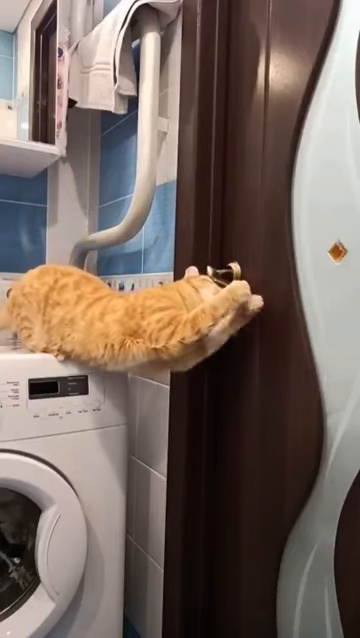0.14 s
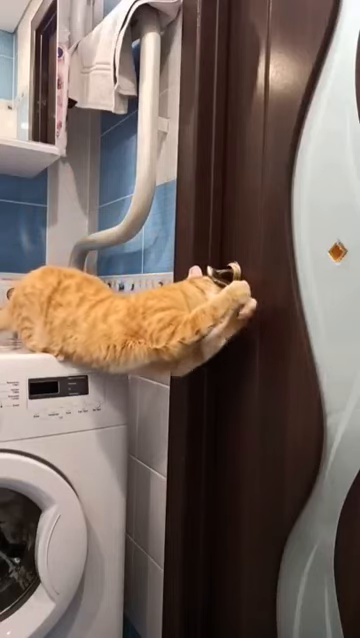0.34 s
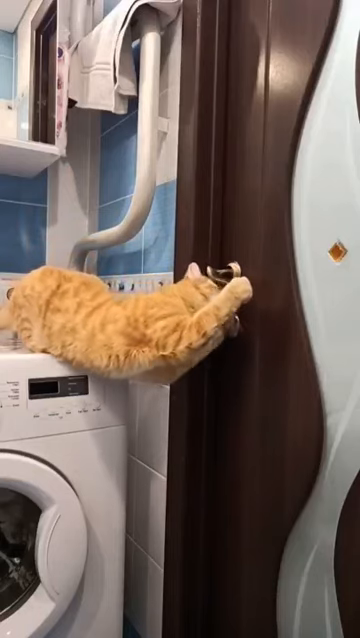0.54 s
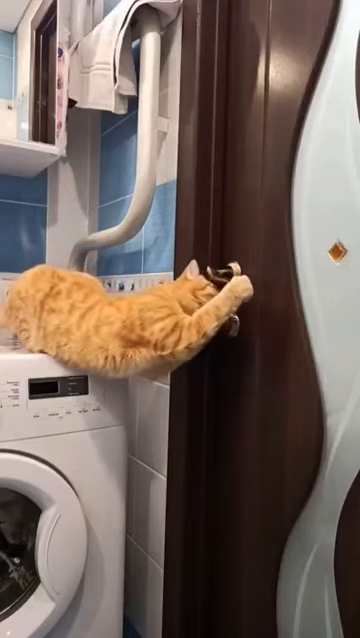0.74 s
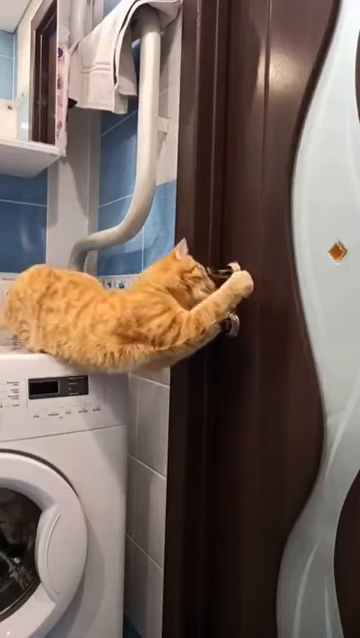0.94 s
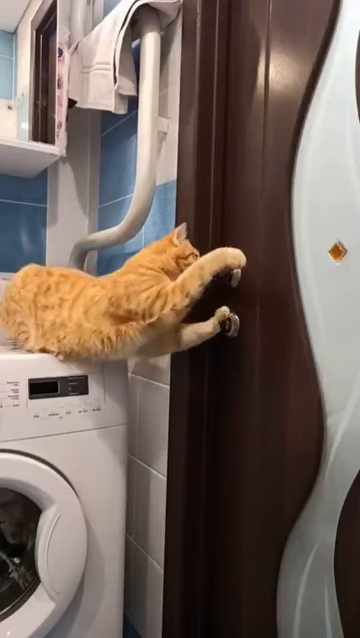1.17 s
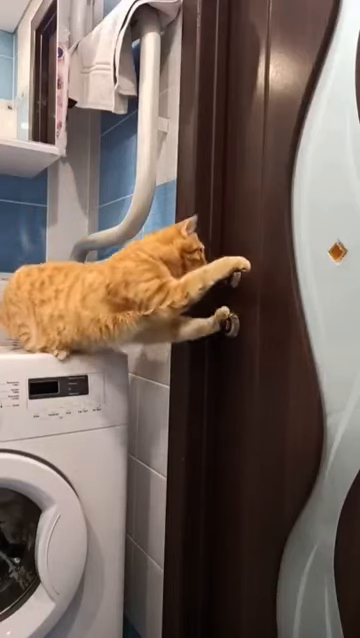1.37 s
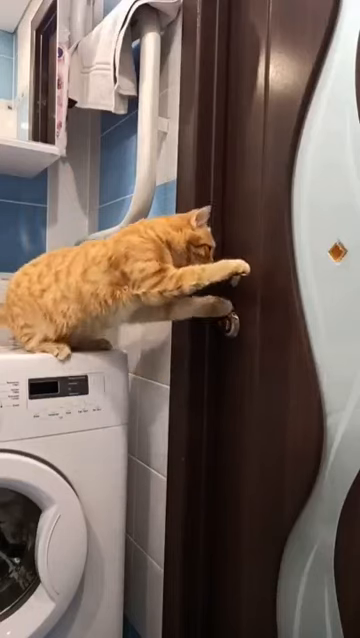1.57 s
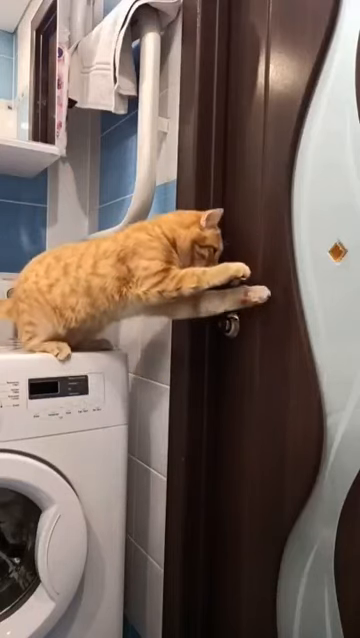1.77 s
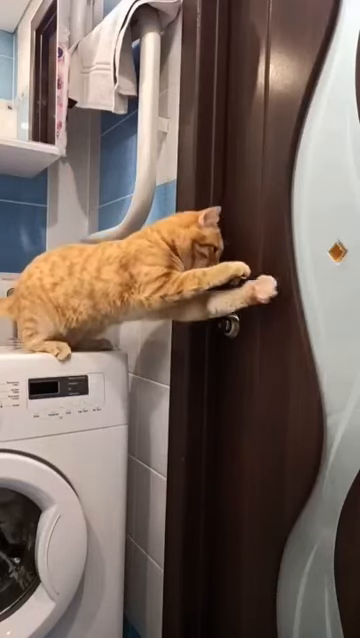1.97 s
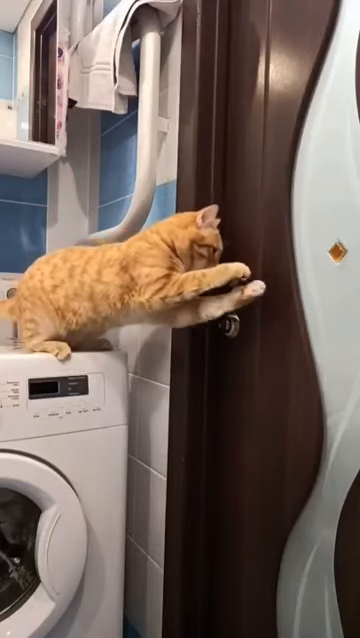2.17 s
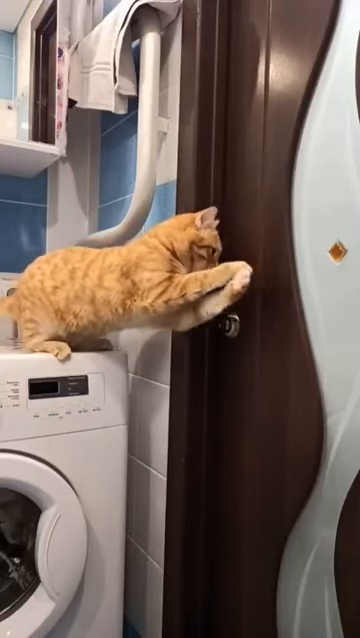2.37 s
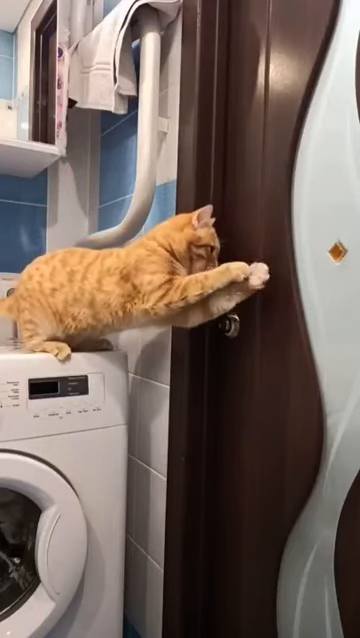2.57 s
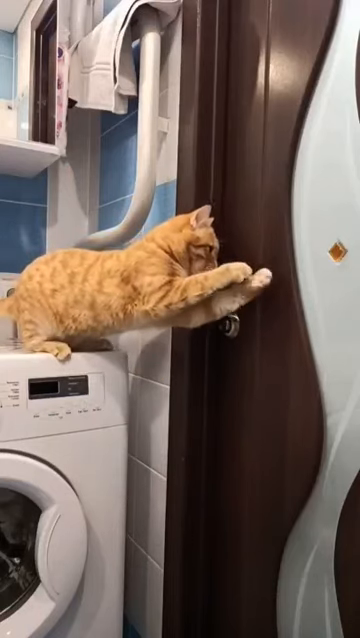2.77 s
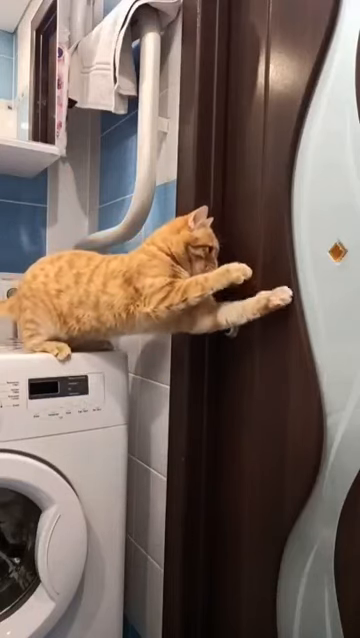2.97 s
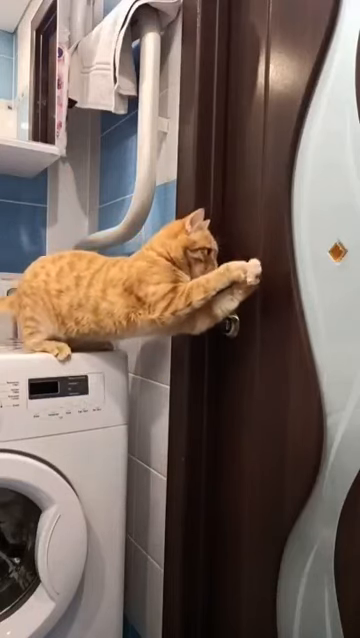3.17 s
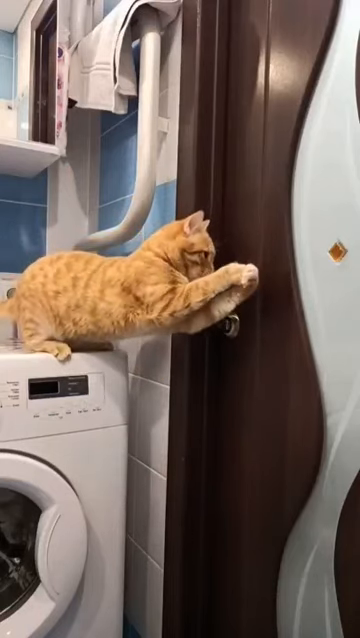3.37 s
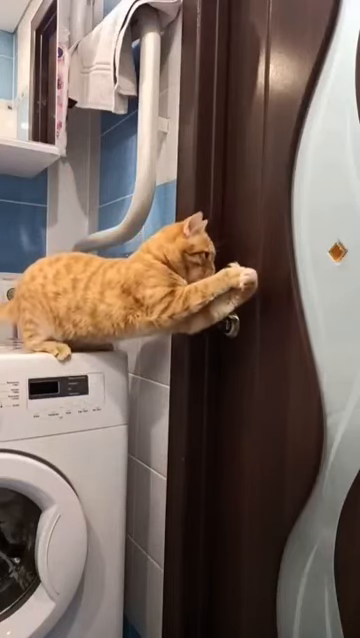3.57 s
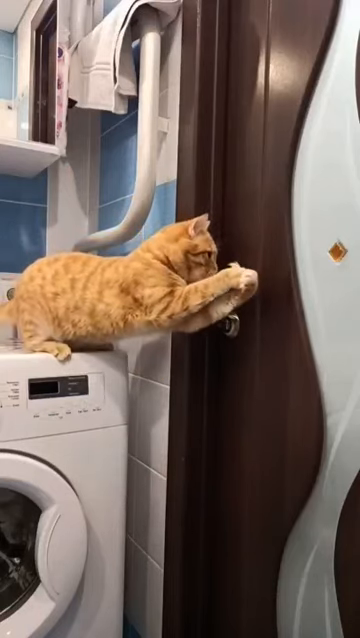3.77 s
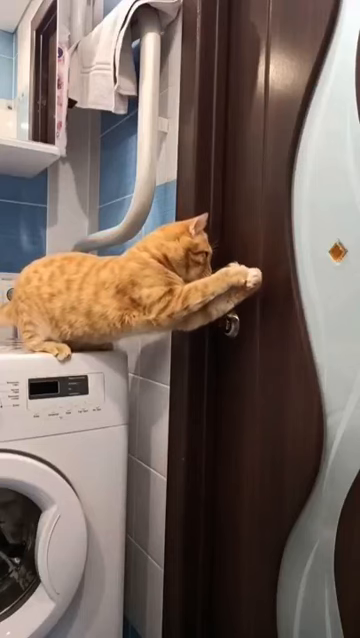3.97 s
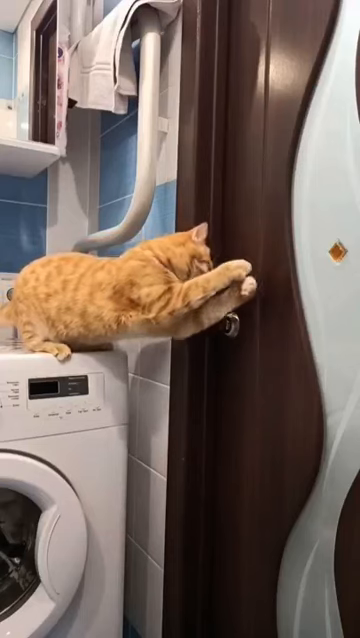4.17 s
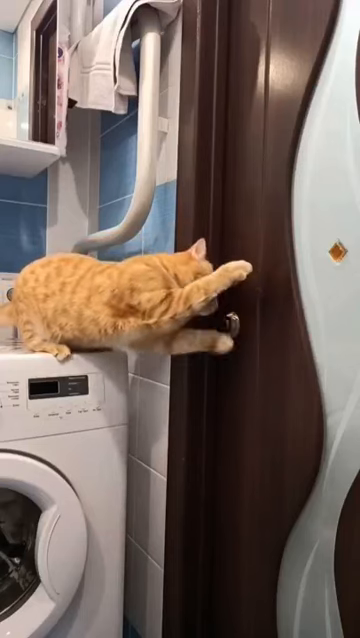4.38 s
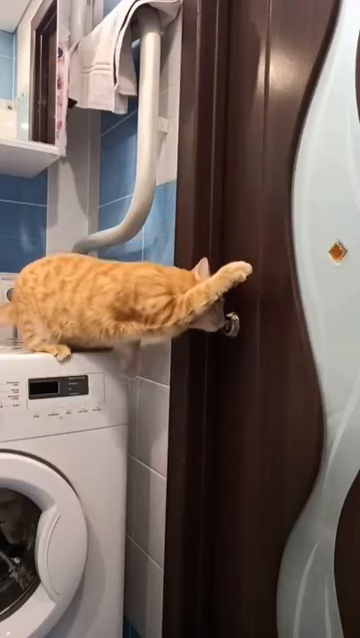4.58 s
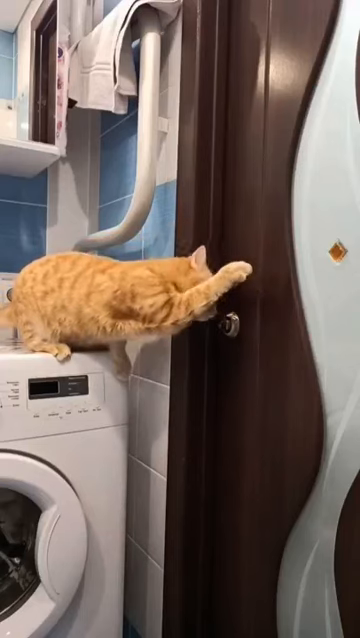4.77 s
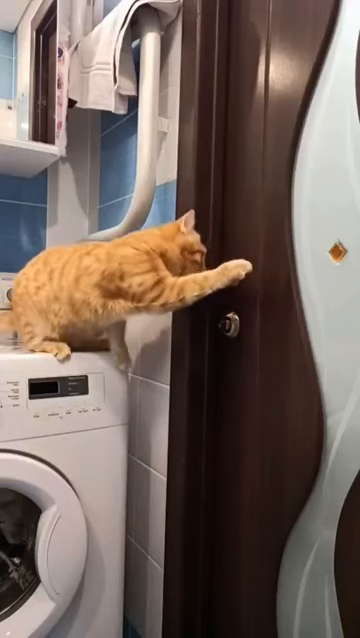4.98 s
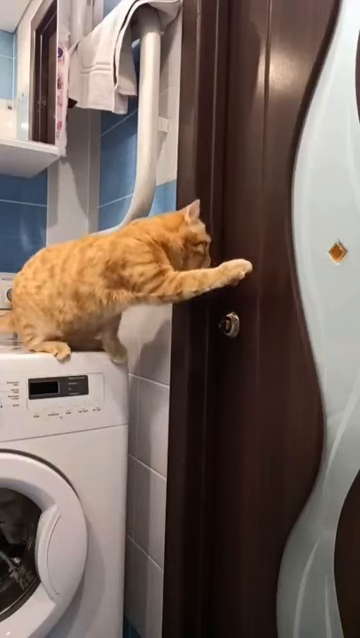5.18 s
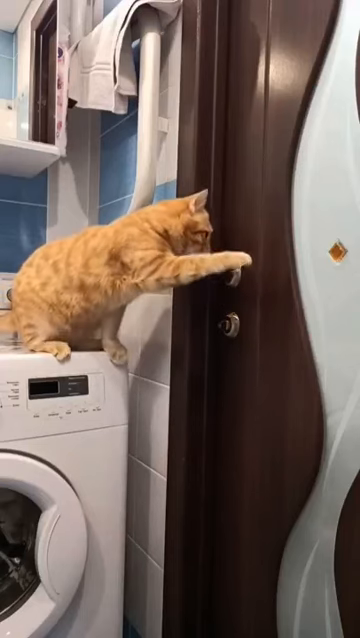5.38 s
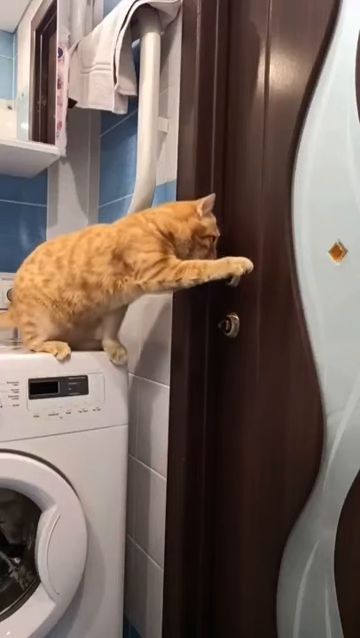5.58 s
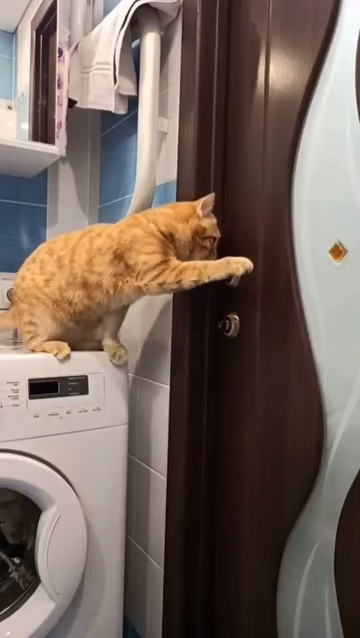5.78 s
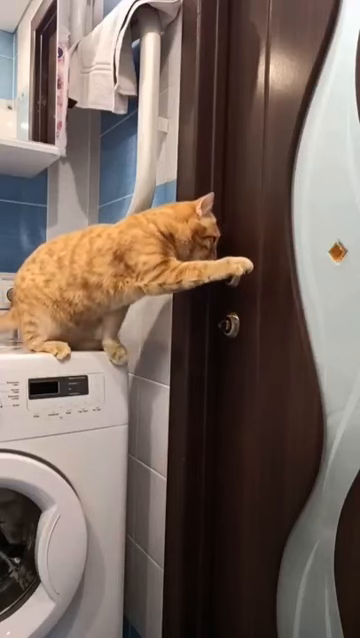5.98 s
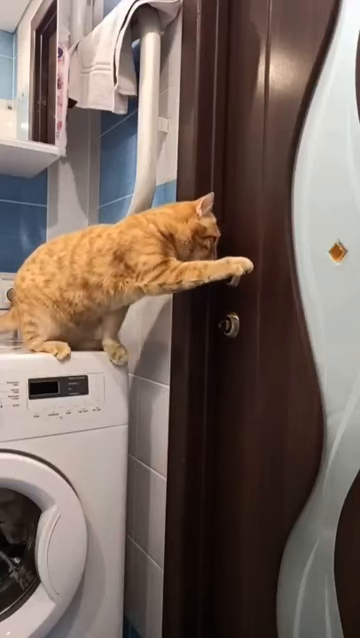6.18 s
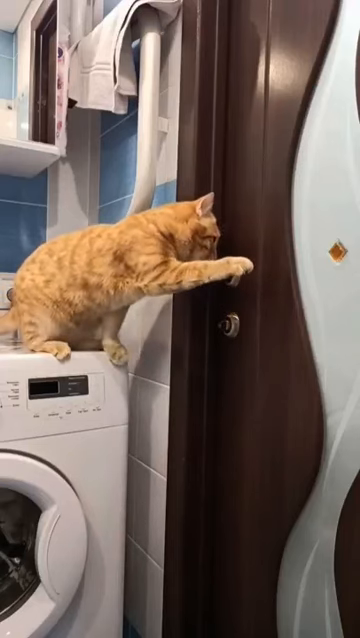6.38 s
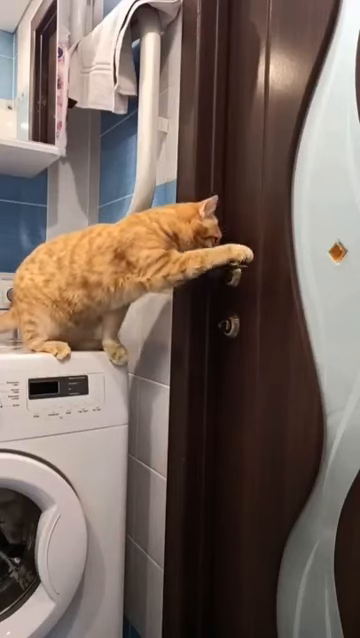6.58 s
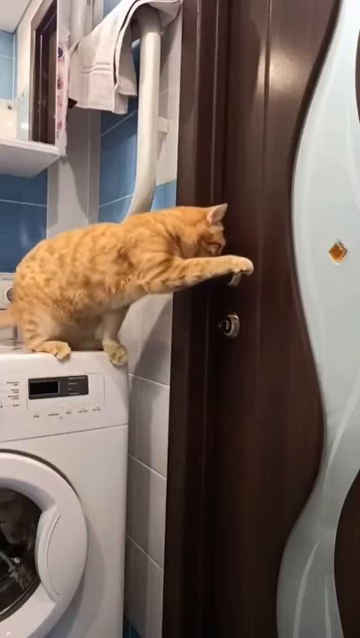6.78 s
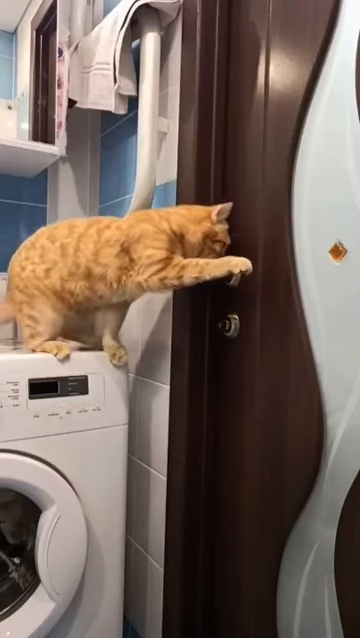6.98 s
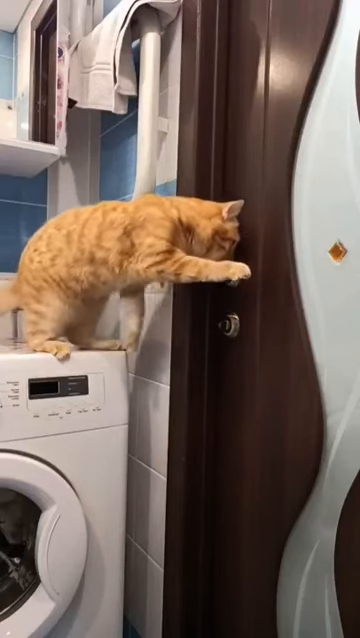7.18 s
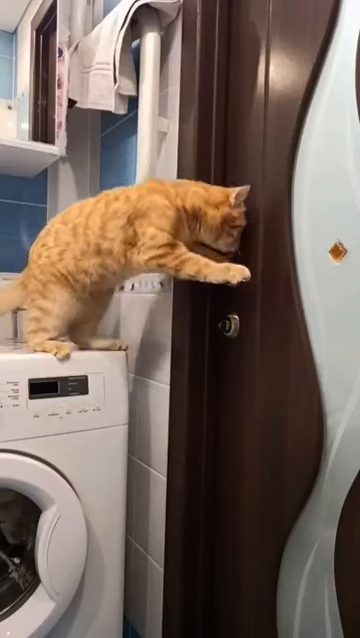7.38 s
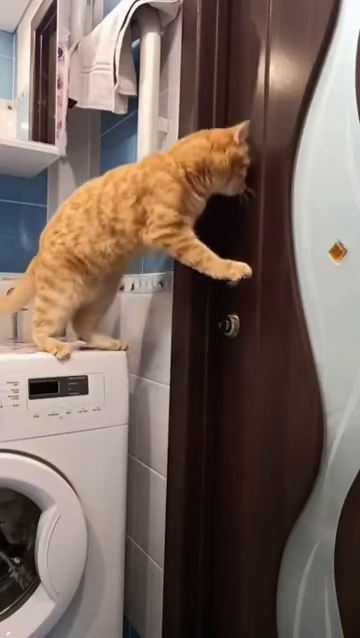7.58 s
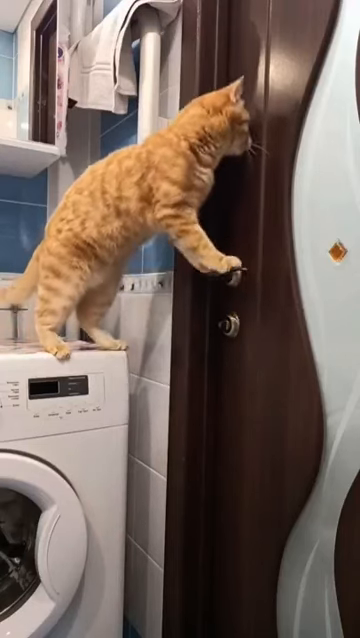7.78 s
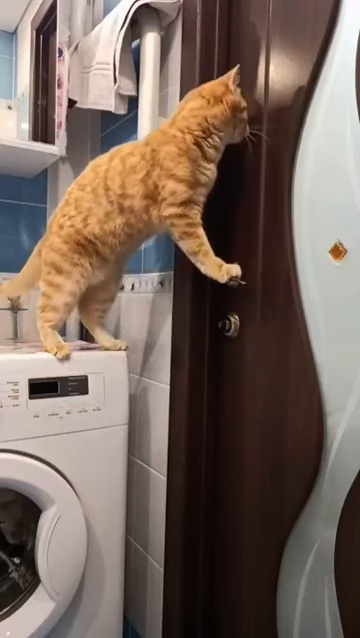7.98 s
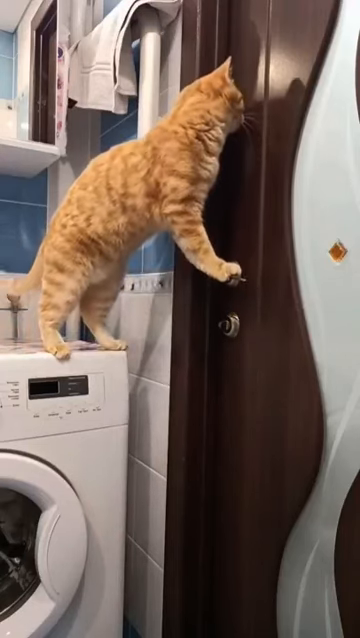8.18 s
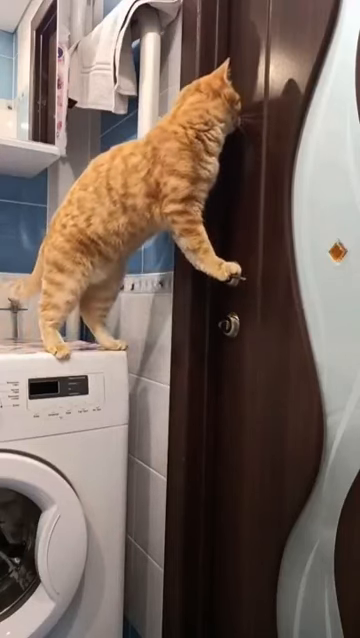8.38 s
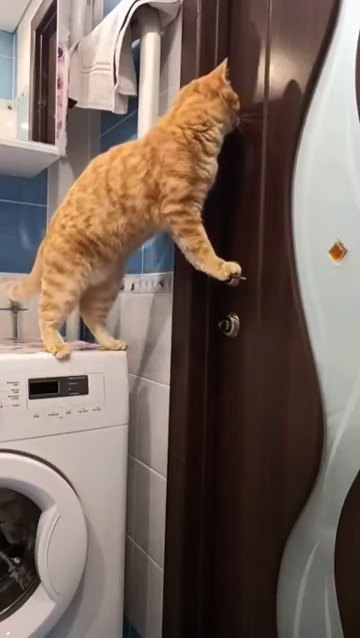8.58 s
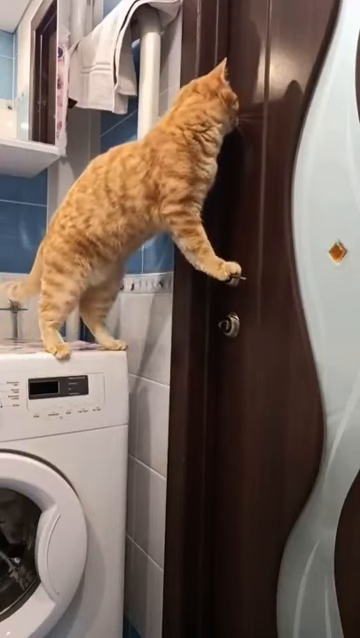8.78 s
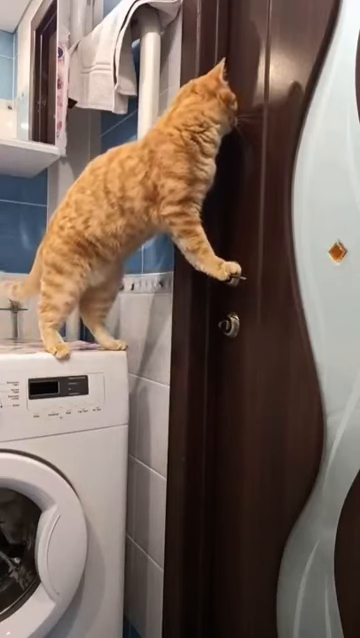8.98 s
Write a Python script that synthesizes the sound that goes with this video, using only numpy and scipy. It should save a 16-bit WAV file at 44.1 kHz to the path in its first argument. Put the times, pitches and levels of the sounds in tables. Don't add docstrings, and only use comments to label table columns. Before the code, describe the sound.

Irregular clicks and knocks of a door handle and latch, padded paw thuds and later sharp lever slams, over quiet low room rumble.

```python
import sys
import numpy as np
from scipy import signal
from scipy.fft import rfft, irfft, next_fast_len
from scipy.io import wavfile
from scipy.ndimage import uniform_filter1d

SR = 44100
rng = np.random.default_rng(int(sys.argv[2]) if len(sys.argv) > 2 else 0)


def linear_from_db(decibels):
    return 10 ** (np.asarray(decibels, float) / 20)


def generate_wav(sig):
    pcm = np.round(np.clip(np.atleast_2d(sig).T, -1, 1) * 32767).astype(np.int16)
    wavfile.write(sys.argv[1], SR, pcm)


N = 398663
PADDED = next_fast_len(N)

# [Hz, dB, s]
DOOR_MODES = [(83.6, -4.5, 0.45), (97.9, -7, 1), (165, -0.5, 0.62), (190.4, -7.5, 0.83), (237, -7.5, 0.52),
              (254.3, -9.5, 0.54), (294.4, 1.5, 0.14), (338.7, -10, 0.27), (383.5, -6.5, 0.28),
              (424.7, -7.5, 0.25), (446, 0, 0.18), (477, 0.5, 0.11), (508.6, -17, 0.27),
              (593.5, -4.5, 0.16), (652, -3.5, 0.084), (750.5, -14.5, 0.31), (883, -10, 0.25),
              (1000, -30, 0.14), (1130, -30, 0.044)]
# [Hz, dB per Hz]
METAL_COLOUR = [(300, -8), (600, -8.5), (1050, -4.5), (1550, -6.5), (2050, -0.5), (2450, -2.5), (3100, 0),
                (3800, 2.5), (4700, 0.5), (6300, 4.5), (8500, 0.5), (12000, -5.5), (14000, -1.5),
                (15800, -20)]
# [Hz, s]
TILE_DECAY = [(300, 0.54), (1000, 0.38), (3000, 0.31), (8000, 0.32), (15000, 0.23)]
# [Hz, -1 to 1]
LIKENESS = [(60, 0.51), (200, 0.82), (500, 0.44), (1200, 0.0026), (2500, 0.14), (5000, 0.0045),
            (8000, 0.99), (14000, 0.9)]
# [Hz, dB per Hz]
FLOOR_COLOUR = [(40, -22), (75, -9.5), (100, 1), (130, -4.5), (250, -7), (450, -11.5), (900, -18.5),
                (1500, -23), (3000, -25), (5000, -25), (7200, -25.5), (8600, -32), (13000, -28.5),
                (16000, -27)]
# [Hz, Hz, dB, dB]
DIM_BANDS = [(4790, 6120, -4, -5.5), (8666, 11730, -37, -9), (4850, 5530, -4, 1)]
# [Hz, Hz, dB, dB]
CLOSED_TOP = [(15830, 30000, -90, -90)]
# [Hz, dB]
LEAN_HITS = [(60, -4), (110, -1), (200, -1), (380, -2), (700, 0.5), (1290, -1.5), (2380, -1.5), (4400, -1),
             (8120, -2.5), (15000, -5)]
# [Hz, dB]
LEAN_FLOOR = [(60, 8.5), (110, 6.5), (200, 3.9), (380, 4.1), (700, 1.4), (1290, 3), (2380, 0.61),
              (4400, 0.5), (8120, 2.5), (15000, 1.0)]

# [s, dB, Hz]
CLAW_TICKS = [
    (0.479, -45.5, 4000),
    (0.701, -39, 4580),
    (1.164, -29.5, 3900),
    (1.623, -26.5, 3900),
    (1.625, -30.5, 7500),
    (2.82, -44.5, 2970),
    (7.794, -43.5, 3880),
]
# [s, dB, Hz]
LATCH_CHATTER = [
    (0.904, -28.5, 2480),
    (0.912, -18.5, 4280),
    (0.918, -20.5, 1970),
    (0.925, -17.5, 2570),
    (0.932, -23, 1140),
    (0.946, -24, 3150),
    (0.976, -42, 1810),
]
# [s, dB, Hz]
LEVER_KNOCKS = [
    (0.841, -37, 2240),
    (0.859, -50, 2100),
    (0.881, -31, 3170),
    (1.735, -51.5, 1800),
    (1.901, -46.5, 3540),
    (1.907, -38.5, 3540),
    (2.179, -48, 3550),
    (3.47, -38.5, 2980),
]
# [s, dB, Hz]
LEVER_SLAMS = [
    (1.18, -31.5, 4000),
    (5.183, -45.5, 1190),
    (5.28, -24, 1990),
    (5.294, -49, 3920),
    (5.319, -50, 3600),
    (5.473, -46.5, 3790),
    (6.445, -28.5, 4080),
    (6.448, -33, 2050),
    (7.565, -29.5, 3540),
]
# [s, dB, Hz]
SWINGS_AND_BRUSHES = [
    (4.634, -57, 6900),
    (4.734, -55, 6500),
    (5.271, -29.5, 3830),
    (6.428, -42.5, 2960),
    (7.543, -38, 2030),
]
# [s, dB, Hz]
PAD_PATS = [(.361, -58, 3450), (2.371, -58, 2110), (2.385, -56, 1300), (2.506, -55.5, 2820),
            (3.785, -61, 1300), (4.04, -63, 2800), (4.18, -63, 1300), (4.31, -55.5, 1400),
            (4.875, -62, 1000), (6.639, -58, 1360), (7.094, -58, 3150), (7.132, -59.5, 1900),
            (7.821, -51, 2850), (7.858, -52.5, 2730)]
# [table, s, dB, dB]
CONTACTS = [
    (CLAW_TICKS, 0.00212, -43, -4),
    (LATCH_CHATTER, 0.0021, -16.5, -11),
    (LEVER_KNOCKS, 0.0037, -3, -6.5),
    (LEVER_SLAMS, 0.0031, 1.5, -6.5),
    (SWINGS_AND_BRUSHES, 0.01, -2, -2),
    (PAD_PATS, 0.0089, 3.2, -1.5),
]

# [s, dB, Hz, dB per octave]
DOOR_JOLTS = [(0.849, -39.5, 447, 3), (0.922, -25, 465, 5.5), (0.944, -30.5, 423, 1.5),
              (0.973, -36, 165, 4.5), (1.166, -23.5, 446, 1.5), (1.627, -43, 470, 1),
              (1.913, -37, 457, 3.5), (2.505, -40, 473, 1), (5.283, -21.5, 510, 13.5),
              (5.319, -33.5, 444, -3), (5.479, -38, 250, 7), (6.453, -20.5, 445, 12.5),
              (6.489, -29.5, 387, 5), (6.649, -47, 186, 11), (7.544, -31, 278, 0), (7.573, -22.5, 504, 9.5),
              (7.609, -27.5, 287, 2.5), (7.848, -43, 176, 1)]
# [s, dB, Hz, dB per octave]
PAW_STEPS = [(0.068, -54.5, 171, 11), (0.368, -48.5, 118, 9), (0.725, -54, 99.6, 5), (2.204, -38.5, 237, 9),
             (2.38, -39.5, 101, 4), (2.987, -36.5, 229, 6), (3.039, -43, 192, 18), (3.293, -51, 194, 5),
             (3.465, -52.5, 180, 1), (4.039, -48.5, 156, 5), (4.18, -45, 272, 10), (4.295, -44.5, 175, 5),
             (4.339, -38, 99, 4.5), (4.447, -49, 104, 23), (4.866, -48.5, 107, 1.1), (5.01, -45.5, 248, 15),
             (5.1, -59, 253, 23), (5.186, -39, 165, 8), (5.983, -56, 168, 2), (6.12, -51, 175, 13.5),
             (6.909, -63, 180, -6), (7.093, -48.5, 226, 4), (7.162, -50, 175, 2), (7.242, -46.5, 169, 4),
             (8.487, -51, 172, 1)]
# [table, s, 0 to 1, dB, share per dB]
BLOWS = [
    (DOOR_JOLTS, 0.0049, 0.82, -31, .02),
    (PAW_STEPS, 0.0085, 0.77, -52.5, 0.014),
]
# [s, dB]
SWELLS = [
    (.4, 2),
    (1.4, 2),
    (3.2, 1.5),
    (4.3, 2.5),
    (5.15, 6.5),
    (6.65, 5.5),
    (7.4, 1),
]


def at_hz(points, hz):
    points = np.array(points)
    return np.interp(np.log(hz), np.log(points[:, 0]), points[:, 1])


def ring(force, hz, t60):
    r, w = linear_from_db(-60 / (t60 * SR)), 2 * np.pi * hz / SR
    return signal.lfilter([0, np.sin(w)], [1, -2 * r * np.cos(w), r * r], force + 1e-18)


def peak_one(x):
    return x / (np.abs(x).max() + 1e-20)


def bright(x, hz, turns):
    return peak_one(ring(x, hz, turns / hz))


def add(track, start_s, sound, level_db):
    at = max(round(start_s * SR), 0)
    track[at:at + len(sound)] += linear_from_db(level_db) * sound[:N - at]


def filtered(x, order, hz, kind):
    return signal.sosfilt(signal.butter(order, hz, kind, fs=SR, output="sos"), x)


def band_only(spectrum, hz, low_hz, high_hz):
    return irfft(spectrum * (hz > low_hz) * (hz <= high_hz), PADDED)[:, :N]


def stereo_noise(size, db_of_hz):
    hz = np.maximum(np.fft.rfftfreq(size, 1 / SR), 1)
    mid, side = rfft(rng.standard_normal((2, size))) * linear_from_db(db_of_hz(hz))
    alike = np.clip(at_hz(LIKENESS, hz), -1, 1)
    shared = np.sqrt((1 + alike) / 2) * mid
    opposed = np.sqrt((1 - alike) / 2) * side
    return irfft(shared + opposed * [[1], [-1]], size)


def dim_and_lean(x, column, lean):
    hz = np.maximum(np.fft.rfftfreq(PADDED, 1 / SR), 1)
    dim_db = sum(row[column] * (hz > row[0]) * (hz < row[1]) for row in DIM_BANDS + CLOSED_TOP) * 1.0
    dim_db = uniform_filter1d(dim_db, size=N // 500)
    lean_db = at_hz(lean, hz) * [[0.5], [-0.5]]
    return irfft(rfft(x, PADDED) * linear_from_db(dim_db + lean_db), PADDED)[:, :N]


def house_floor(hits):
    floor_db, rumble_db, swell_s = -59, 1.07, 0.27
    noise = dim_and_lean(stereo_noise(PADDED, lambda hz: at_hz(FLOOR_COLOUR, hz)), column=3, lean=LEAN_FLOOR)
    rumble = filtered(noise, 1, 400, "low")
    t = np.arange(N) / SR
    swell_db = rumble_db + sum(db * np.exp(-((t - s) / swell_s) ** 2) for s, db in SWELLS)
    noise = noise + rumble * (linear_from_db(swell_db) - 1)
    level = linear_from_db(floor_db) / noise.std()

    hz = np.fft.rfftfreq(PADDED, 1 / SR)
    spectrum = rfft(noise, PADDED)
    edges = np.linspace(DIM_BANDS[1][0], DIM_BANDS[1][1], 5)
    treble = filtered(hits[0], 2, 2000, "high")
    loudness = uniform_filter1d(treble ** 2, size=1024, origin=500) / linear_from_db(-49.5) ** 2
    for low_hz, high_hz, early_db in zip(edges, edges[1:], (1, 0, 14, 14)):
        over = (loudness * linear_from_db(2 * early_db)) ** 2
        noise = noise - band_only(spectrum, hz, low_hz, high_hz) * over / (1 + over)
    return level * noise


def thuds():
    out, t = np.zeros(N), np.arange(SR // 2)[:, None] / SR
    mode_hz, mode_db, t60 = np.transpose(DOOR_MODES)
    count = len(mode_hz)
    blows = sorted((*row, *shared) for rows, *shared in BLOWS for row in rows)
    for start_s, peak_db, hz, fall_db, rise_s, ring_mid, mid_db, ring_loss in blows:
        ring_share = np.clip(ring_mid - ring_loss * (peak_db - mid_db), 0.3, 1)
        spread_db = rng.normal(0, 1.5, count)
        strength = linear_from_db(mode_db + spread_db - fall_db * abs(np.log2(mode_hz / hz)))
        modes = np.sin(2 * np.pi * (mode_hz * t + rng.random(count)))
        modes = modes * linear_from_db(-60 * t / (t60 * ring_share))
        swell_in = (1 - np.exp(-t / rise_s)) ** 2
        add(out, start_s - 0.004, peak_one((modes * swell_in) @ strength), peak_db)
    return out


def rattle(length_s, roughness_db):
    t = np.arange(4096) / SR / length_s
    grains = rng.standard_normal(4096) * linear_from_db(roughness_db * rng.standard_normal(128)).repeat(32)
    spectrum = rfft(grains * (1 - np.exp(-t / 0.75)) * np.exp(-t), 8192)
    smooth_power = uniform_filter1d(np.abs(spectrum) ** 2, size=60)
    return irfft(spectrum / np.sqrt(smooth_power), 8192)[:4096]


def clacks():
    out = np.zeros(N)
    contacts = sorted((*row, *shared) for rows, *shared in CONTACTS for row in rows)
    for start_s, peak_db, bright_hz, rattle_s, dull_db, sharp_db in contacts:
        burst = rattle(rattle_s, roughness_db=3)
        dull = linear_from_db(dull_db) * bright(burst, 1120, turns=1.72)
        edge = filtered(burst, 2, 5000, "high")
        air = filtered(edge, 2, 10000, "high")
        sharp = linear_from_db(sharp_db) * peak_one(edge + (linear_from_db(0.41 * sharp_db + 9.5) - 1) * air)
        add(out, start_s, bright(burst, bright_hz, turns=3.54) + dull + sharp, peak_db - 4.5)
    return out


def slide():
    peak_s, level_db, rise_s, fall_s, lead_s = 2.905, -48, 0.069, 0.022, 0.09
    out = np.zeros(N)
    t = np.arange(SR // 5) / SR - lead_s
    level_db = level_db - 16 * abs(t / np.where(t < 0, rise_s, fall_s)) ** 1.7
    grains = rng.standard_normal(len(t)) * linear_from_db(2.3 * rng.standard_normal(len(t)))
    drag = linear_from_db(-38) * peak_one(grains)
    drag = drag + bright(grains, 3150, turns=5.4) + linear_from_db(5) * bright(grains, 4300, turns=3.1)
    add(out, peak_s - lead_s, drag / drag.std() * linear_from_db(level_db), -8)
    return out


def bathroom(x, colour, wet_db):
    t, lead = np.arange(SR // 2) / SR, 64
    hz = np.maximum(np.fft.rfftfreq(len(t), 1 / SR), 1)
    spectrum = rfft(stereo_noise(len(t), colour))
    direct = np.roll(irfft(linear_from_db(colour(hz)), len(t)), lead) * (t < 2 * lead / SR)
    tail = linear_from_db(-wet_db) * direct
    for centre_hz in 62.5 * 2 ** np.arange(9):
        share = np.clip(1 - abs(np.log2(hz / centre_hz)), 0, 1)
        decay = (1 - np.exp(-t / 0.0042)) * linear_from_db(-60 * t / at_hz(TILE_DECAY, centre_hz))
        tail = tail + irfft(spectrum * share, len(t)) * decay
    tail = tail / np.sqrt(np.mean(np.sum(tail ** 2, axis=1)))
    return signal.fftconvolve(x, tail, axes=1)[:, lead:lead + N]


def duck_band(x):
    low_hz, high_hz, threshold_db = 4920, 5625, -42.5
    hz = np.fft.rfftfreq(PADDED, 1 / SR)
    treble = filtered(x[0], 2, 2500, "high")
    loudness = uniform_filter1d(treble ** 2, size=2048, origin=-400) / linear_from_db(threshold_db) ** 2
    over = loudness ** 2
    return x - band_only(rfft(x, PADDED), hz, low_hz, high_hz) * over / (1 + over)


def wood_colour(hz):
    return at_hz([(100, -9), (260, 2.5), (1000, 0)], hz)


def scene():
    blows = thuds()[None]
    wood = linear_from_db(-2.5) * blows + linear_from_db(-6) * bathroom(blows, wood_colour, wet_db=-23.5)
    contacts = (clacks() + slide())[None]
    metal = linear_from_db(9) * bathroom(contacts, lambda hz: at_hz(METAL_COLOUR, hz), wet_db=-22)
    hits = dim_and_lean(metal + wood, column=2, lean=LEAN_HITS)
    hits = filtered(hits, 4, 70, "high")
    return duck_band(hits + house_floor(hits))


def low_pass(x):
    return signal.sosfilt(signal.butter(12, 16320, fs=SR, output="sos"), x)


def record(dry):
    return low_pass(dry)


dry = scene()
out = record(dry)
generate_wav(out)
```